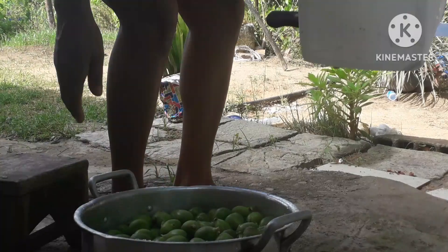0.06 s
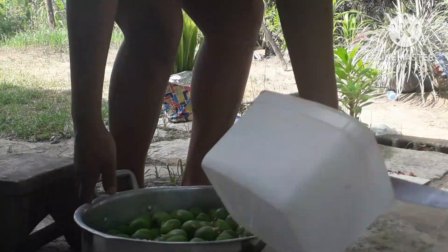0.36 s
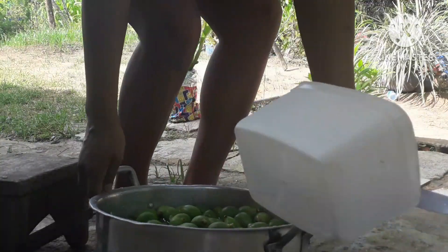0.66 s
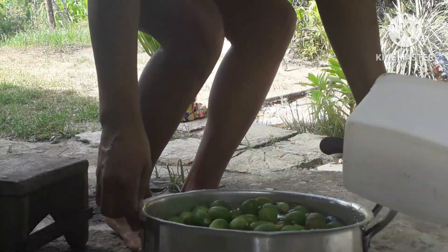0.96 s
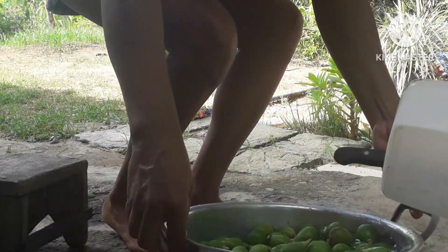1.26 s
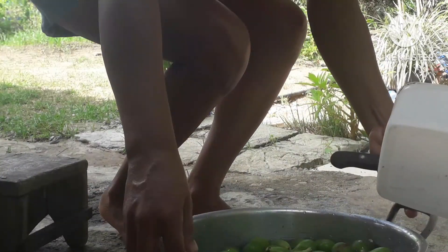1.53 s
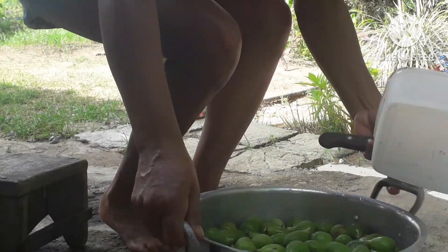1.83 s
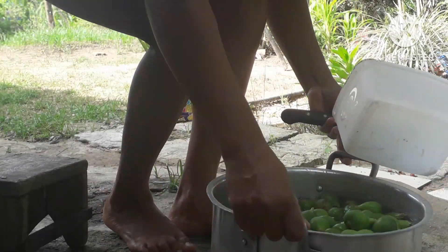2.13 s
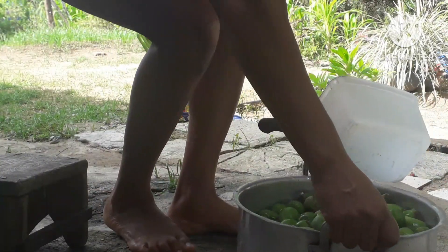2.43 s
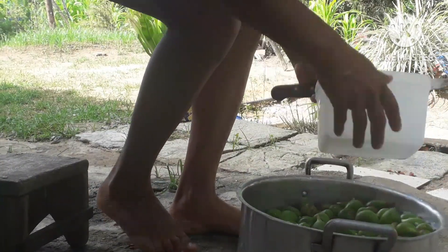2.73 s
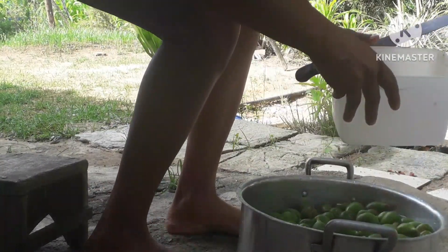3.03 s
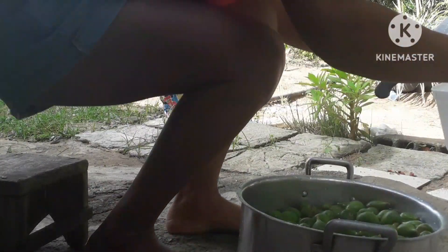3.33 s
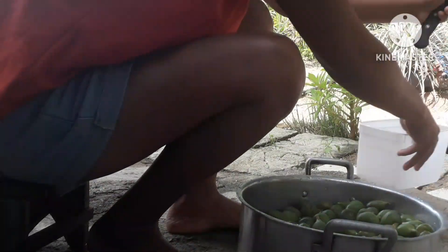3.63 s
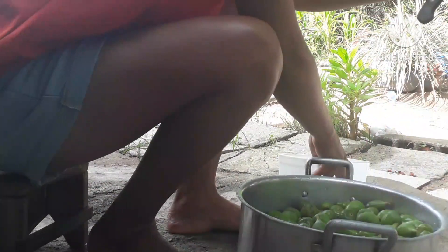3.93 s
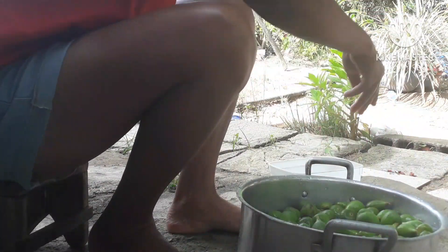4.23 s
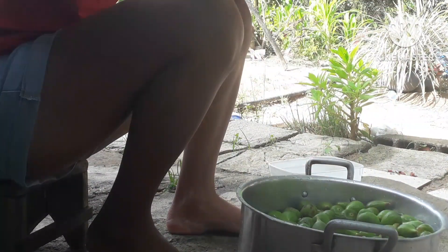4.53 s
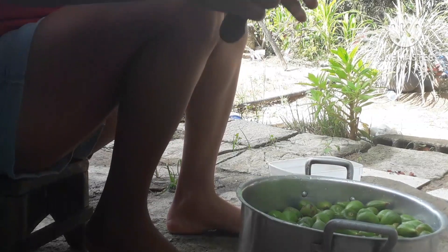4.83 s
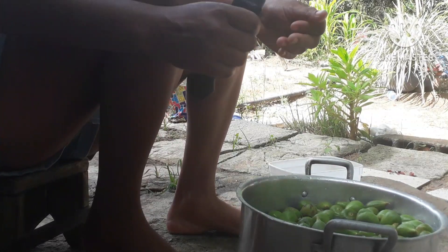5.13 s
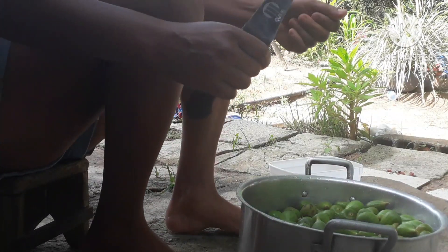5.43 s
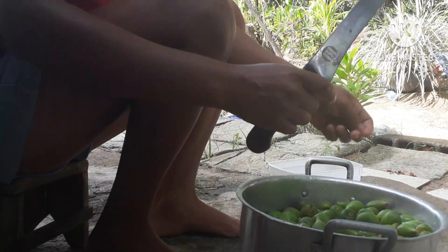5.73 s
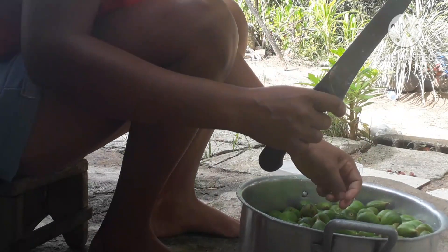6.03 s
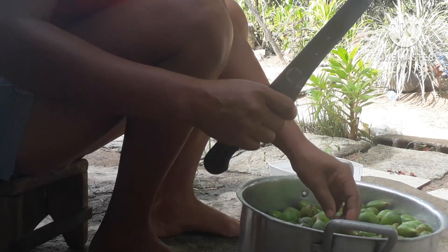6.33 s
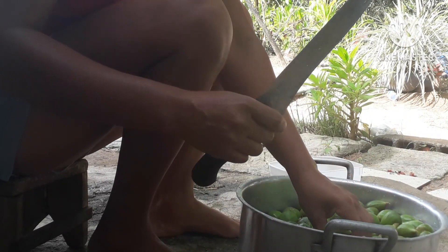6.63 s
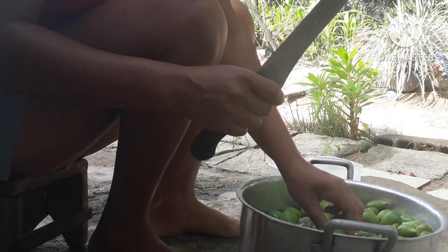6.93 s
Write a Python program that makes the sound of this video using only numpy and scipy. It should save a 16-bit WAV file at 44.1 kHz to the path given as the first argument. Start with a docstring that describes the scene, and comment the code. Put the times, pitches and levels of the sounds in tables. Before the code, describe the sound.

Water laps gently in a metal pot as it is dragged over stone paving, with scrapes, dull bumps and sharp clicks from the pot and its handles. A bird whistles faintly early on. Then someone settles on a low wooden stool, which knocks, bumps and rubs irregularly under the shifting weight while clothes rustle. The microphone is close, outdoors in a quiet garden.

```python
"""Water laps in a metal pot of figs as someone drags it over stone paving, clicking and bumping.
Then they settle on a low stool: hollow wood bumps, knocks and rubs under the shifting weight.
Each lap rings an air pocket; scrapes are swarms of tiny stick-slips; knocks ring the wood's modes.
Clothes rustle with the movement, and early on a bird whistles faintly over quiet garden air."""
import sys
import numpy as np
from scipy import signal
from scipy.fft import rfft, irfft, next_fast_len
from scipy.io import wavfile
from scipy.ndimage import uniform_filter1d, map_coordinates

SR = 44100
rng = np.random.default_rng(int(sys.argv[2]) if len(sys.argv) > 2 else 0)


def dump(signal):
    """Clip the signal to [-1, 1] and save it as 16-bit WAV at the path in sys.argv[1]."""
    limited = np.clip(np.atleast_2d(signal).T, -1, 1)
    pcm = np.round(limited * 32767).astype(np.int16)
    wavfile.write(sys.argv[1], SR, pcm)


N = 307641
TIME = np.arange(N) / SR
AGE = np.arange(SR // 4) / SR   # seconds into one short hit

# soft, hollow bumps, first the pot on the paving, later the wooden stool; the rows at 3.948, 4.105 and 5.568
# instead give the hard knocks there a pitched ring: # (time [s], level [dB], pitch [Hz])
SOFT_BUMPS = [(1.24,-43.5,160),(1.335,-30.5,305),(1.403,-28.5,250),(1.442,-39,110),(2.516,-42,131),(2.67,-42.5,254),(3.022,-36,232),(3.254,-29,275),(3.393,-29,298),(3.456,-27,266),(3.552,-32.5,297),(3.636,-34.5,380),(3.708,-34.5,358),(3.761,-36,370),(3.88,-28.5,292),(3.948,-26.5,800),(3.985,-37.5,327),(4.105,-27.5,723),(4.553,-33,360),(4.602,-31,323),(4.87,-34.5,320),(5.195,-27,324),(5.305,-35,303),(5.411,-27.5,285),(5.508,-32,266),(5.568,-40,834),(5.755,-32.5,296),(5.834,-35,272),(5.903,-39,290),(5.953,-38,336),(6.09,-36,322),(6.146,-34,316),(6.231,-32.5,286),(6.296,-33.5,400),(6.421,-34,272),(6.536,-36,392),(6.881,-27.5,308),(6.918,-33.5,288),(6.962,-32,280)]
# hard knocks on the wood: (time [s], boom [dB], clack [dB], clack pitch [Hz], crack [dB],
# nominal crack t60 [s])
HARD_KNOCKS = [(3.436,-18.5,-29,865,-29,0.16),(3.948,-32.5,-29.5,910,-32,0.048),(3.961,-20.5,-31,1160,-40,0.08),(4.105,-23.5,-45,660,-37,0.054),(4.151,-28.5,-33.5,890,-55,.09),(4.284,-49,-36,865,-50,0.11),(4.464,-23.5,-33.5,860,-34.5,0.16),(4.790,-27.5,-33.5,830,-42,0.12),(5.393,-20,-36,630,-35,0.17),(5.57,-22.5,-29,880,-37,0.13),(5.718,-18.5,-50,624,-31.5,0.093),(6.050,-25,-40,840,-31.5,0.12),(6.312,-17.5,-29.5,1090,-28.5,0.17),(6.472,-28,-36,845,-37,0.13),(6.643,-19.5,-33.5,830,-28.5,0.14)]


def from_db(db):
    """Decibels to gain."""
    return 10 ** (np.asarray(db) / 20)


def rms_one(x):
    """Scale to unit rms."""
    return x / np.sqrt(np.mean(x ** 2) + 1e-20)


def peak_one(x, size=256):
    """Scale the loudest stretch of `size` samples to unit rms."""
    return x / np.sqrt(uniform_filter1d(x ** 2, size).max() + 1e-20)


def add(out, s, sound):
    """Mix a sound in at time s."""
    at = max(round(s * SR), 0)
    out[at:at + len(sound)] += sound[:N - at]


def decay(t60):
    """A tail that falls 60 dB in t60 seconds."""
    return from_db(-60 * AGE / t60)


def attack(rise_s):
    """A rounded onset."""
    return 1 - np.exp(-AGE / rise_s)


def swell(rise_s):
    """A smooth rise and fall that peaks rise_s after its start."""
    return np.hanning(int(2 * rise_s * SR)) ** 4


def drift(per_s):
    """A random wander of about unit size, with per_s turning points a second."""
    knots = rng.standard_normal(N // 100)
    return np.interp(TIME * per_s, np.arange(len(knots)), knots)


def grains(per_s, spread_db, size=N):
    """Tiny impulses of uneven size at random moments."""
    signs = (rng.random(size) < per_s / SR) * rng.choice([-1, 1], size)
    return signs * from_db(spread_db * np.minimum(rng.exponential(1, size), 4))


def band(x, low_hz, high_hz):
    """A gentle band-pass."""
    return signal.sosfilt(signal.butter(2, [low_hz, high_hz], "band", fs=SR, output="sos"), x)


def resonance(x, hz, width_hz):
    """A two-pole resonance with unit gain at its peak."""
    r = np.exp(-np.pi * width_hz / SR)
    feedback = [1, -2 * r * np.cos(2 * np.pi * hz / SR), r * r]
    return signal.lfilter(np.array([1, 0, -1]) * (1 - r * r) / 2, feedback, x + 1e-18)


def coloured(x, spectrum):
    """Apply an EQ curve of (frequency [Hz], level [dB]) points, then scale to unit rms."""
    hz, db = np.transpose(spectrum)
    size = next_fast_len(len(x))
    bin_hz = np.arange(size // 2 + 1) * SR / size + 1
    gain = from_db(np.interp(np.log(bin_hz), np.log(hz), db))
    return rms_one(irfft(rfft(x, size) * gain, size)[:len(x)])


def garden_air(level_db=-62, waver_db=1.5):
    """A quiet, slightly wavering bed of open air."""
    # tone of the air: (frequency [Hz], level [dB])
    air_eq = [(30,-11),(124,3),(200,-12),(430,-4),(580,-15),(720,-9),(920,-20),(1300,-3),(1850,-16),(3600,-10.5),(6500,-14.5),(9000,-24),(16000,-29)]
    return from_db(level_db + waver_db * drift(18)) * coloured(rng.standard_normal(N), air_eq)


def bird(warble=0.0234, twitter_db=2.5):
    """Distant whistles: pure glides that flutter in pitch and level."""
    # bird calls: (start [s], length [s], start pitch [Hz], end pitch [Hz], level [dB])
    whistles = [(.085,.07,3950,5450,-68),(.655,.04,4800,4650,-67),(.9,.22,3450,3550,-71),(.12,.13,5000,6700,-69),(.22,.09,6500,8900,-73),(.79,.12,3550,3480,-69),(.815,.115,5030,5120,-64),(.945,.125,4720,4500,-65.5),(1.088,.055,4480,4800,-68),(1.1,.08,5700,6050,-70),(1.19,.1,6250,6100,-69),(1.2,.09,4800,4550,-66),(1.335,.035,4050,4650,-55),(1.375,.04,4800,4550,-59)]
    out = np.zeros(N)
    for start, length, from_hz, to_hz, db in whistles:
        size = int(length * SR)
        pitch = np.linspace(from_hz, to_hz, size) * (1 + warble * drift(430)[:size])
        envelope = from_db(db + twitter_db * drift(70)[:size]) * np.sqrt(2 * np.hanning(size))
        add(out, start, envelope * np.sin(2 * np.pi * np.cumsum(pitch) / SR))
    return out


def ripples(count=70, gap_s=0.06):
    """Small, loosely spaced laps of the swaying water: (time [s], relative level [dB])."""
    late, size = rng.standard_normal((count, 2)).T
    return list(zip(gap_s * (np.arange(count) + 0.26 * late), -50 + 2 * size))


def water(trim_db=-4, pocket_hz=740, overtone_db=-11, splash_db=-20):
    """Each lap rings an air pocket in one rounded blip, followed by drops and a little splash."""
    # the clearest laps: (time [s], relative level [dB])
    laps = [(0.122, -45.5), (0.266, -40), (0.42, -40), (0.455, -40.5), (0.531, -44), (0.564, -40),
            (0.608, -41), (0.632, -40.5), (0.679, -40), (0.752, -39.5), (0.854, -39), (0.884, -40),
            (1.004, -37.5), (1.116, -42), (1.18, -40), (2.191, -33), (2.327, -43.5), (2.433, -39.5),
            (2.651, -36)]
    out = np.zeros(N)
    for s, db in list(laps) + ripples():
        hz = pocket_hz * np.exp(0.025 * rng.standard_normal())
        drops = grains(3000, 0.43, size=len(AGE)) * decay(0.076) * attack(0.005)
        pocket = (AGE == 0) + 0.2 * drops
        for _ in range(3):   # three passes round off the blip's onset
            pocket = resonance(pocket, hz, width_hz=155)
        overtone = from_db(overtone_db) * peak_one(resonance(drops, hz=1150, width_hz=250))
        splash = from_db(splash_db) * peak_one(band(drops, 820, 5500))
        add(out, s, from_db(db + trim_db) * (peak_one(pocket) + overtone + splash))
    return out


def wood(force):
    """The hollow wooden body answers a force with all its low modes."""
    # body modes: (frequency [Hz], bandwidth [Hz], level [dB])
    modes = [(130.4, 28.4, 5.5), (159.5, 43.8, 5), (238, 30.6, 2.5), (277.5, 26, 2), (333.3, 20.7, 5),
             (406.1, 22, 4), (515, 32, -3.5), (650, 120, -9.5), (751, 30, -6.5), (886.5, 22.4, 0.5),
             (948, 11, -7), (1150, 32, -9.5), (1300, 10, -8)]
    return sum((-1) ** k * from_db(db) * resonance(force, hz, width)
               for k, (hz, width, db) in enumerate(modes))


def upper_ring(clear_t60=0.085, crowd_t60=0.042):
    """The wood's high ring after a tap: a few clear modes in a crowd of weak ones."""
    # the clear high modes: (frequency [Hz])
    high_modes = [1552, 1787, 1770, 1960, 2196, 2585, 2830, 3350]
    clear = sum(np.sin(2 * np.pi * (hz * AGE + rng.random())) for hz in high_modes)
    crowd = 17 * rng.standard_normal(len(AGE))
    ring = clear * decay(clear_t60) + crowd * decay(crowd_t60)
    return ring / np.sqrt(np.sum(ring ** 2))


def upper_wood(force, ring):
    """A force stirs the wood's high modes."""
    return signal.fftconvolve(force, ring)[:len(force)]


def bent(x, detune=0.003):
    """Shifting weight bends the pitches of the ringing wood."""
    read_at = np.arange(len(x)) + np.cumsum(detune * drift(6)[:len(x)])
    return map_coordinates(x, [read_at], order=3, mode="mirror")


def sticking():
    """A gain that ducks the rubbing wherever the slide sticks for a moment."""
    # catches in the slide, a negative dip being a lift: (centre [s], half-length [s], dip [dB])
    catches = [(3.203,0.086,6),(3.365,0.069,3.5),(3.856,0.095,7.5),(4.415,0.021,2),(4.775,0.052,11.5),(5.169,.075,2.5),(5.386,0.024,5),(5.708,0.054,4),(6.022,0.033,3.5),(6.214,0.019,5),(6.62,0.021,-1.5)]
    dip_db = np.zeros(N)
    for centre, half, db in catches:
        add(dip_db, centre - half, db * np.sqrt(swell(half)))
    return from_db(-dip_db)


def rubbing_envelopes(rumble_bed_db=-2.5):
    """Envelopes for rumble, scrape and hiss: light strokes hiss, heavy ones rumble."""
    # steady shuffling under the strokes: (time [s], rumble [dB], scrape [dB], hiss [dB])
    bed = [(1.0, -95, -58, -89), (1.28, -86, -44.5, -78), (1.42, -60, -75, -69), (1.51, -40, -60, -61),
           (1.9, -64, -48, -64.5), (2.512, -67, -53.5, -64), (2.73, -45.5, -45, -57),
           (3.3, -43.5, -44.5, -52.5), (3.5, -43, -44, -52.5), (4.1, -37, -44.5, -48),
           (4.449, -37.5, -44, -49.5), (5.05, -42.5, -48.5, -50.5), (5.7, -43.5, -46, -48.5),
           (6.15, -38, -42, -47), (6.98, -38, -48.5, -50)]
    # single strokes: (centre [s], half-length [s], scrape [dB], lightness [dB])
    scuffs = [(0.295,0.061,-62.5,24.5),(1.125,0.035,-57,16),(1.19,0.028,-57,13),(1.245,0.042,-55,4),(1.352,0.032,-47.5,19),(1.395,0.032,-39,11),(1.66,0.13,-42.5,4.5),(1.862,0.13,-50.5,-0.5),(2.235,0.2,-44,9.5),(2.38,0.052,-54,26.5),(2.83,0.12,-46,14),(2.905,0.035,-43.5,17),(2.97,0.23,-46,12.5),(3.12,0.045,-40.5,8),(3.27,0.061,-41,9),(3.415,0.07,-37.5,13),(3.575,0.12,-39.5,14.5),(3.79,0.094,-48.5,20.5),(3.903,0.11,-41,13),(4.04,0.061,-40,10),(4.235,0.044,-51.5,-13),(4.305,0.033,-40.5,16),(4.643,0.097,-36.5,1.5),(4.953,0.051,-37.5,8.5),(5.017,0.069,-41.5,15),(5.105,0.04,-46,19),(5.245,0.065,-36.5,11),(5.32,0.094,-43,0),(5.555,0.03,-34,3),(5.61,0.11,-38,-2.5),(5.89,0.016,-35.5,7.5),(5.918,0.076,-34,-1.5),(6.19,0.04,-37,10),(6.435,0.056,-41,11),(6.498,0.032,-46,3),(6.815,0.038,-40.5,13),(6.905,0.11,-39.5,13.5)]
    # in the same columns: the wood slides on after each knock, cloth brushes along with each bump
    slides = [(s + 0.049, 0.056, boom_db - 28.5, -8) for s, boom_db, *_ in HARD_KNOCKS]
    brushes = [(s + 0.018, 0.06, db - 14, 5) for s, db, _ in SOFT_BUMPS]
    times, *levels = np.transpose(bed)
    powers = [from_db(np.interp(TIME, times, db) + trim_db) ** 2
              for db, trim_db in zip(levels, (rumble_bed_db, 0, 0))]
    for centre, half, db, lightness in list(scuffs) + slides + brushes:
        for power, tilt_db in zip(powers, (2 - lightness, 0, lightness - 19.5)):
            add(power, centre - half, from_db(db + tilt_db) ** 2 * swell(half))
    return np.sqrt(powers) * sticking()


def rubbing(ring, slip_db=2.5, sway_db=2, seated_s=3.2):
    """Stick-slip rumbles and scrapes, first on stone, then in the wood; cloth and grit hiss on top."""
    # tone of the scrape: (frequency [Hz], level [dB])
    scrape_eq = [(200, -7.5), (550, 4.5), (850, 13), (1050, 4.5), (1700, 0), (2200, -6), (3300, -9.5),
                 (4500, -9), (5800, -26), (9000, -35), (16000, -49)]
    # tone of cloth and grit: (frequency [Hz], level [dB])
    rustle_eq = [(1000, -34), (2500, 2), (4300, 8.5), (6000, 1.5), (9000, -3.5), (11000, -3), (13000, -3),
                 (16000, -8)]
    rumble_gain, scrape_gain, hiss_gain = rubbing_envelopes()
    judder = from_db(slip_db * drift(70) + sway_db * drift(20))
    rumble = rms_one(band(wood(grains(2500, spread_db=0.16)), 147, 445) * judder)
    friction = grains(4000, spread_db=4.6) * judder
    on_stone = coloured(friction, scrape_eq)
    ringing = coloured(upper_wood(friction, ring), scrape_eq)
    woody = rms_one(band(wood(friction), 960, 2150))
    in_wood = bent(1.32 * ringing + 0.58 * woody)
    scrape = rms_one(np.where(TIME > seated_s, in_wood, on_stone))
    hiss = coloured(grains(14000, spread_db=3.6) * judder, rustle_eq)
    return rumble_gain * rumble + scrape_gain * scrape + hiss_gain * hiss


def pot_clicks(mid_trim_db=-9, band_ratio=1.47):
    """Handles, pot and grit make hard contact: a snap, then a gritty skid whose treble dies first."""
    # contacts: (time [s], body pitch [Hz], body [dB], relative mid [dB], treble [dB], skid [0-1])
    contacts = [(0.479,850,-34.5,-35.5,-51.5,0.4),(1.408,1600,-32,-28,-40,0.12),(1.441,544,-23,-21.5,-40,0.11),(1.469,1360,-38,-38,-39,0.33),(1.557,630,-35.5,-28.5,-52,0.3),(1.563,650,-41,-39,-28,0.14),(1.774,800,-68,-38.5,-56,0.4),(1.962,890,-45,-40,-68,1),(2.496,700,-34.5,-56,-36.5,0.7),(2.515,830,-25,-52,-28,0.08),(2.5702,1400,-33.5,-43,-49,0.06),(2.576,1200,-46,-37,-38.5,0.23),(2.67,754,-31.5,-60,-66,0.25),(2.709,900,-41,-52,-33,0.08),(2.728,925,-57,-57,-39,0.2),(2.755,610,-34,-35,-56,0.3),(2.779,800,-54,-27,-36.5,0),(5.030,710,-57,-53,-41,0.4),(5.106,704,-36.5,-45,-37.5,0.16)]
    # tone of the bright tick: (frequency [Hz], level [dB])
    tick_eq = [(2500, 3.6), (4000, 6.8), (5200, 5.6), (7500, 6.8), (9000, 1.2), (10800, 11), (13000, 3),
               (16000, 1.2)]
    out = np.zeros(N)
    snap = decay(0.013)
    for s, hz, body_db, mid_db, treble_db, skid in contacts:
        envelope = snap + skid * decay(0.27)
        noise = rng.standard_normal((3, len(AGE)))
        body = band(noise[0] * envelope, hz / band_ratio, hz * band_ratio)
        mid = band(noise[1] * envelope, 1600, 5400)
        tick = coloured(noise[2], tick_eq) * (snap + skid * decay(0.19))
        for layer, db in (body, body_db), (mid, mid_db + mid_trim_db), (tick, treble_db):
            add(out, s, from_db(db) * peak_one(layer))
    return out


def hollow_bumps(roughness=0.046):
    """The pot bumps the paving, later the stool bumps, and a few hard knocks ring at a pitch: a padded push
    stirs only modes near its pitch."""
    out = np.zeros(N)
    for s, db, hz in SOFT_BUMPS:
        force = (AGE == 0) + roughness * rng.standard_normal(len(AGE)) * decay(0.15)
        hollow = wood(force)   # one set of low modes voices both pot and stool
        bump = resonance(hollow, hz, width_hz=130) * attack(0.0024)
        add(out, s, from_db(db) * peak_one(bump, size=1024))
    return out


def crunch(count=7, gap_s=0.0033, loss_db=2.5):
    """A quick, uneven run of slips, each weaker than the last."""
    force = np.zeros(len(AGE))
    gaps = gap_s * rng.uniform(0.55, 1.45, count)
    onsets = ((np.cumsum(gaps) - gaps[0]) * SR).astype(int)
    force[onsets] = from_db(-loss_db * np.arange(count))
    return force


def padded(force, top_hz=1300):
    """A soft contact rolls off the treble."""
    return signal.sosfilt(signal.butter(2, top_hz, fs=SR, output="sos"), force + 1e-18)


def wood_knocks(ring, boom_trim_db=-1, rebound_s=0.0043):
    """Each knock thuds, booms in the low modes, clacks with every slip and cracks in the high modes."""
    out = np.zeros(N)
    crack_onset = (1 + 0.14 * (AGE > rebound_s)) * attack(0.0006)
    # tone of the crack: (frequency [Hz], level [dB])
    crack_eq = [(300, -55), (600, 6.5), (900, 0), (1600, 1), (2200, -3), (3200, -7.5), (4500, -4.5),
                (5600, -16.5), (8500, -24.5), (11000, -26), (16000, -35)]
    for s, boom_db, clack_db, clack_hz, crack_db, crack_t60 in HARD_KNOCKS:
        grinding = rng.standard_normal(len(AGE)) * decay(0.15)
        slips = crunch()
        blow = padded((AGE == 0) + 0.5 * slips + 0.03 * grinding)
        thud = resonance(blow + padded(slips), hz=340, width_hz=330)
        boom = bent(wood(blow)) + 0.22 * thud
        contact = slips + 0.082 * grinding
        for _ in range(2):
            contact = resonance(contact, clack_hz, width_hz=600)
        clack = contact + upper_wood(contact, ring) + 2.2 * wood(contact)
        splinters = grains(9000, spread_db=6, size=len(AGE)) * crack_onset * decay(0.85 * crack_t60)
        crack = coloured(upper_wood(splinters, ring), crack_eq)
        for layer, db in (boom, boom_db + boom_trim_db), (clack, clack_db), (crack, crack_db):
            add(out, s, from_db(db) * peak_one(layer, size=1024))
    return out


def scene():
    """All sources at one close microphone."""
    ring = upper_ring()
    movement = wood_knocks(ring) + hollow_bumps() + rubbing(ring) + pot_clicks()
    return (movement + water() + garden_air() + bird())[None]


def record(dry, bass_hz=85, top_hz=15700):
    """The small microphone loses the deep bass; the very top is cut steeply."""
    thin = signal.sosfilt(signal.butter(2, bass_hz, "high", fs=SR, output="sos"), dry)
    return signal.sosfilt(signal.ellip(10, 0.2, 70, top_hz, fs=SR, output="sos"), thin)


dry = scene()
out = record(dry)
dump(out)
```